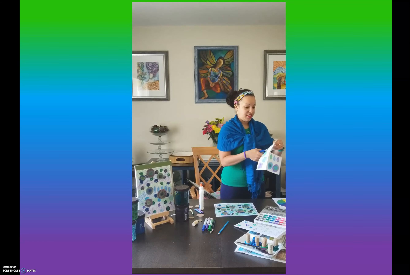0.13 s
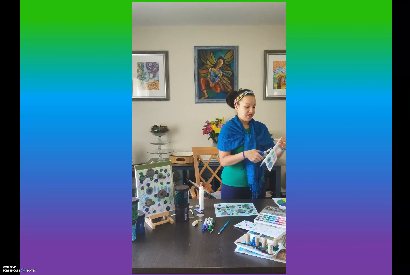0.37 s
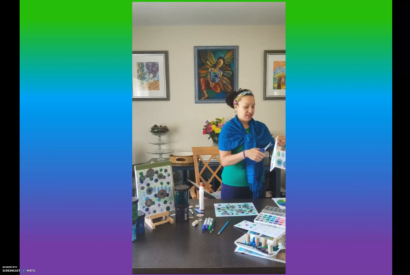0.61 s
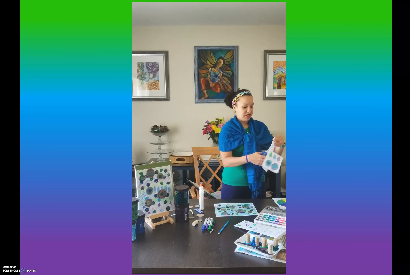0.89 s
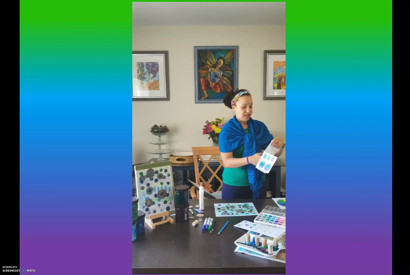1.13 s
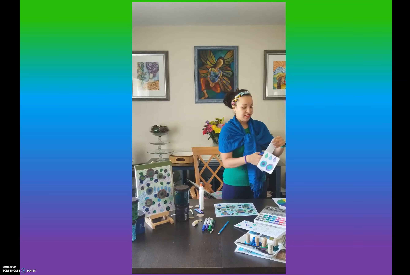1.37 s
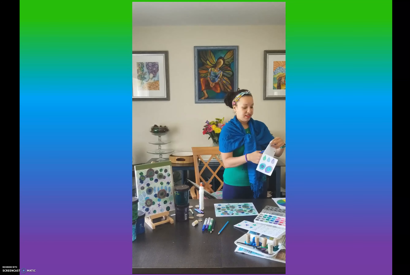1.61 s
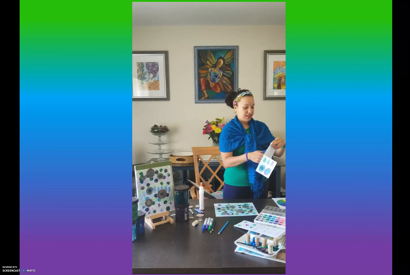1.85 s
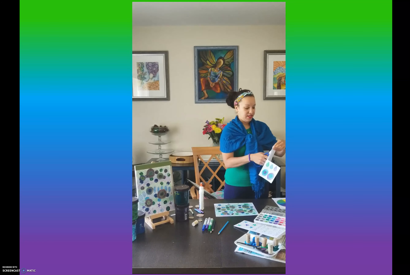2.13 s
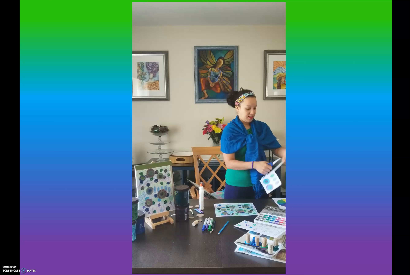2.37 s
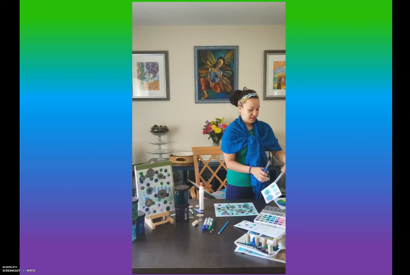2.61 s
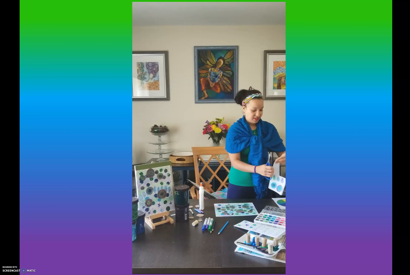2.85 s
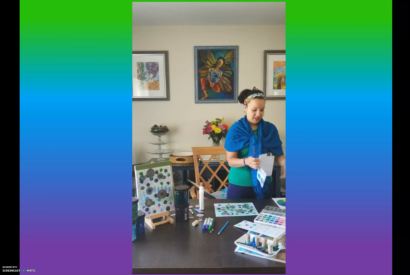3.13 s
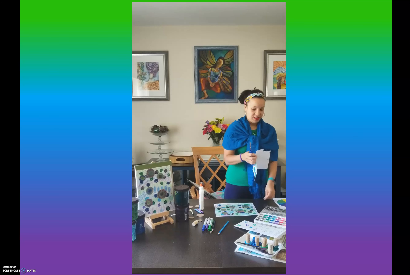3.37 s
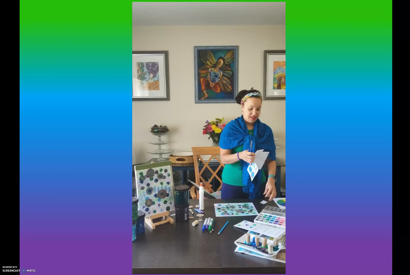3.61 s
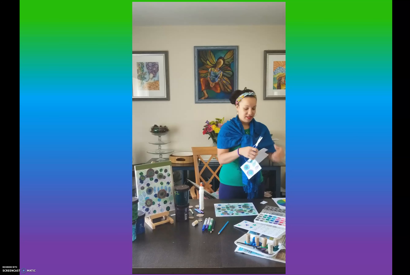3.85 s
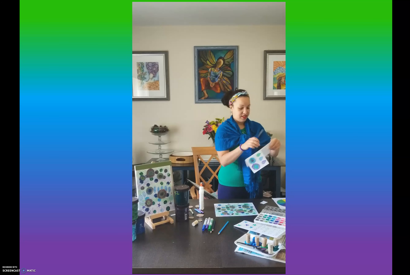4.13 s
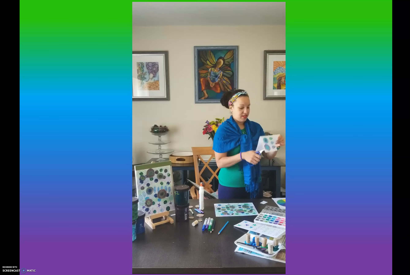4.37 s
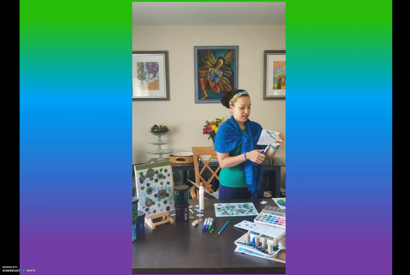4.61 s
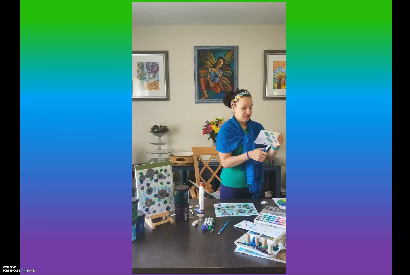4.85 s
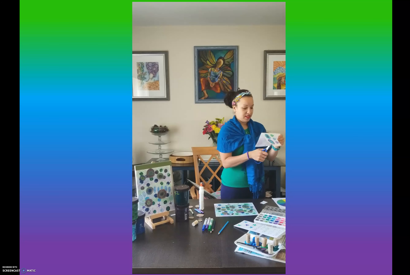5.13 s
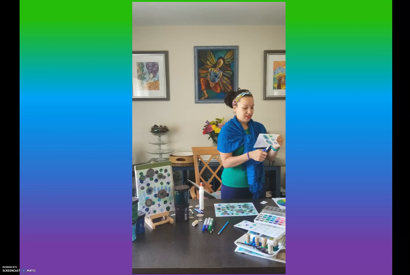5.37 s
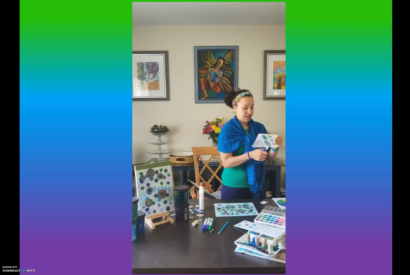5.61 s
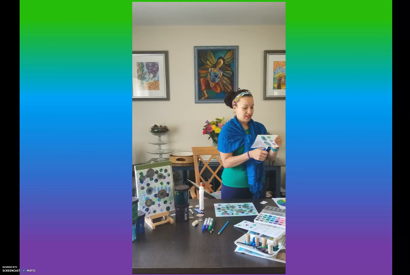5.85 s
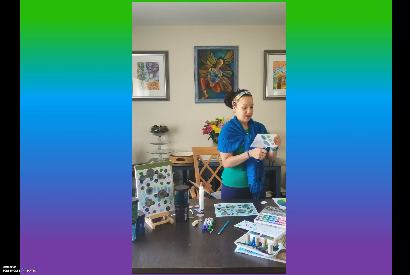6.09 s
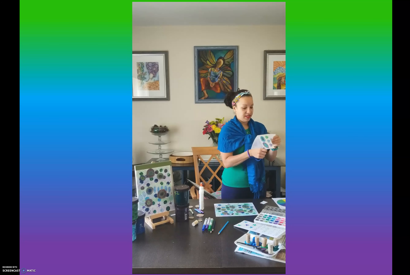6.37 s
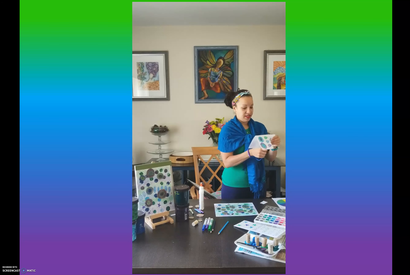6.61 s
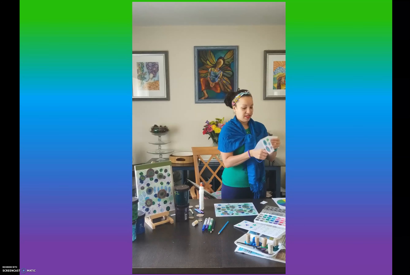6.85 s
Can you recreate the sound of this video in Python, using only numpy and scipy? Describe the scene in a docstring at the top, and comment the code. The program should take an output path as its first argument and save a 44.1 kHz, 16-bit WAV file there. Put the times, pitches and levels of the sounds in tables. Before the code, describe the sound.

Scissors crunch and shear through a creased sheet, with crisp crackles, flaps and soft hollow taps over faint indoor hush.

```python
"""A creased sheet crackles and scissors start biting through it, at a table in a small room.
One microphone stands a few steps away. Shear, rubbing and flapping are filtered grainy noise under gesture
curves; cracks, bites and knocks are short noise bursts; snaps are dying tone pairs; a blade squeaks once.
A sparse-tap room tail follows the paper, over a quiet room hush and a low swelling rumble of filtered noise.
"""
import sys
import numpy as np
from scipy import signal
from scipy.io import wavfile
from scipy.ndimage import uniform_filter1d

SR = 44100
rng = np.random.default_rng(int(sys.argv[2]) if len(sys.argv) > 2 else 0)


def unload_wav(signal):
    """Save mono or channel-first audio to the path in sys.argv[1] as 16-bit WAV at rate SR, clipped to [-1, 1]."""
    wavfile.write(
        sys.argv[1],
        SR,
        np.round(np.clip(np.atleast_2d(signal).T, -1, 1) * 32767).astype(np.int16),
    )


def decibels_to_gain(level_db):
    """Convert a level in decibels to a linear amplitude gain (20 dB per decade)."""
    exponent = np.asarray(level_db, float) / 20
    return 10 ** exponent


N = 307818  # length in samples

# Tables of a spectrum give, in each row, frequency in Hz and relative level in dB per Hz.
# The coming and going of the rumble, and less so of the hush. Each row: time in seconds, rumble level in dB.
SWELL = [(0.0, -67), (1.11, -60.5), (1.81, -82), (2.08, -67), (2.27, -77), (3.22, -64), (3.58, -74),
         (3.75, -64.5), (4.16, -76), (4.35, -64.5), (4.68, -74), (4.88, -68.5), (6.2, -65.5), (6.315, -83),
         (6.4, -67.5), (6.98, -65)]


def sheet():
    """The same parting fibres are heard in shear and rub; slower slaps shake the sheet."""
    fibres = grains(per_s=4000, spread_db=1.45, length_s=0.001)
    slaps = grains(per_s=400, spread_db=2.2, length_s=0.007)
    return shear(fibres) + rub(fibres) + flap(slaps)


def shear(fibres):
    """Each closing of the blades parts fibres, loudest around the pitch of the cut edge."""
    # Each row: moment of most force in seconds, force in dB, build-up in seconds, let-off in seconds,
    # pitch of the cut edge in Hz.
    strokes = [(.085, -43.5, 0.09, 0.03, 3550), (.18, -39.5, 0.046, 0.08, 3300),
               (.39, -35, 0.1, 0.037, 2500), (.465, -41, 0.03, 0.089, 3800),
               (.523, -36.5, 0.034, 0.083, 3800), (1.03, -37.5, 0.053, 0.31, 4350),
               (1.21, -46.5, 0.11, 0.071, 4370), (1.35, -41.5, 0.042, 0.047, 3120),
               (1.44, -43, 0.06, 0.11, 4220), (1.71, -46, 0.077, 0.21, 4870),
               (2.04, -47.5, 0.087, 0.12, 3820), (2.59, -49.5, 0.86, 0.066, 4480),
               (2.72, -53.5, 0.022, 0.035, 4560), (2.84, -47, 0.018, 0.033, 4240),
               (2.97, -43, 0.025, 0.12, 2540), (3.17, -47.5, 0.28, 0.12, 3480),
               (3.36, -45, 0.058, 0.12, 4000), (3.67, -51, 0.1, 0.41, 2800), (3.91, -45, 0.3, 0.037, 2510),
               (4.04, -49, 0.088, 0.054, 2500), (4.25, -45, 0.037, 0.058, 6500),
               (4.31, -42.5, 0.028, 0.1, 2500), (4.47, -54, 0.2, 0.21, 2880), (4.76, -57, .05, 0.066, 3480),
               (4.9, -50, 0.056, 0.1, 3780), (5.15, -43, 0.057, 0.12, 3140), (5.54, -40, 0.16, 0.37, 3160),
               (5.83, -45.5, 0.037, 0.11, 4200), (5.891, -40, 0.081, 0.077, 2700),
               (6.05, -41, 0.11, 0.082, 2350), (6.16, -43.5, 0.093, 0.12, 3930),
               (6.396, -34, 0.047, 0.063, 5800), (6.49, -42.5, 0.15, .13, 4170),
               (6.65, -41, 0.032, 0.17, 3130), (6.859, -34, 0.079, 0.058, 4970),
               (6.98, -39, 0.021, .1, 3760)]
    # Spectrum of paper being sheared.
    shear_spectrum = [(800, -45), (1100, -25), (1300, 0), (1700, -1), (4500, 5.5), (6800, 0), (7600, -1.5),
                      (10000, -22.5), (16000, -98.5)]
    s, force_db, rise, fall, hz = np.transpose(strokes)
    return edge(colour(fibres, shear_spectrum, ring=1.0), s, hz) * gestures(s, force_db, rise, fall)


def rub(fibres):
    """Fingers slide over the surface: bright fibre noise with random streaks of louder and softer pitch."""
    # Each row: moment of the top in seconds, level in dB, build-up in seconds, let-off in seconds.
    slides = [(.03, -48, 0.037, 0.018), (.075, -47, 0.42, 0.011), (.17, -51, 0.029, 0.076),
              (.54, -54, 0.5, 0.44), (.87, -54, 0.02, 0.19), (1.01, -44.5, 0.047, 0.33),
              (1.1, -52, 0.087, 0.11), (1.16, -42, 0.02, 0.057), (1.36, -44, 0.035, 0.11),
              (1.59, -51, 0.0059, 0.07), (1.69, -48.5, 0.017, 0.088), (1.9, -52, 0.0073, 0.11),
              (1.98, -47, 0.0099, 0.082), (2.16, -51, 0.033, .045), (2.57, -46, 0.24, 0.057),
              (2.72, -50, 0.025, 0.044), (2.86, -47.5, 0.044, 0.013), (3.19, -47.5, 0.15, 0.05),
              (3.38, -43.5, 0.099, 0.051), (3.67, -47.5, 0.055, 0.43), (3.93, -48, 0.23, 0.081),
              (4.33, -41.5, 0.062, 0.046), (4.55, -55, 0.15, 0.14), (4.68, -52.5, 0.012, 0.03),
              (4.76, -58, 0.054, .14), (4.9, -50.5, 0.1, 0.13), (5.15, -43, 0.047, 0.11),
              (5.45, -51.5, 0.072, 0.71), (6.12, -48, 0.062, 0.086), (6.44, -48, 0.11, 0.16),
              (6.88, -45, 0.2, 0.057), (6.98, -46, 0.04, .05)]
    # Spectrum of fingers on paper.
    rub_spectrum = [(3000, -17), (6000, 13), (8000, 9), (12000, 9.5), (15500, 8), (17000, -37)]
    streaks = patchy(signal.stft(colour(fibres, rub_spectrum, ring=0.78), nperseg=512)[2])
    rubbing = evened(signal.istft(streaks, nperseg=512)[1][:N])
    return rubbing * gestures(*np.transpose(slides))


def flap(slaps):
    """The sheet flaps in the hand, and the whole sheet booms below with the same slaps."""
    # Each row: moment of the top in seconds, level in dB, build-up in seconds, let-off in seconds,
    # boom of the whole sheet in dB re that level.
    flaps = [(0, -53, .1, 0.12, -5.5), (.19, -55, 0.025, 0.23, -5.5), (.41, -48.5, 0.098, 0.058, -6.5),
             (.52, -40.5, 0.022, 0.1, -8.5), (.89, -54.5, 0.21, 0.057, -1.5), (1.01, -47, 0.024, 0.29, -8),
             (1.18, -41.5, 0.12, 0.073, -9.5), (1.65, -62, 0.06, 0.41, -11), (2.06, -47, 0.064, .1, -10.5),
             (2.51, -58, 0.049, 0.22, -5), (2.57, -52.5, 0.12, 0.11, -4), (2.84, -65, 0.0092, 0.018, 6),
             (2.95, -36.5, .015, 0.093, -8), (3.11, -45.5, 0.096, 0.032, 2.5),
             (3.24, -53.5, 0.17, 0.055, -0.5), (3.4, -47, 0.043, 0.041, -9), (3.67, -47, 0.079, .15, -8.5),
             (3.95, -52.5, 0.43, 0.026, -9), (4.1, -57.5, 0.17, 0.16, -5.5),
             (4.315, -41, 0.06, 0.054, -2.5), (4.345, -40, 0.041, 0.022, -12),
             (4.39, -47.5, .04, 0.11, -12), (4.53, -52.5, 0.083, 0.046, -11),
             (4.67, -55.5, .025, 0.055, -4), (4.78, -53, 0.039, 0.56, -8), (5.13, -46.5, 0.078, 0.082, -13),
             (5.27, -49.5, 0.061, 0.026, -8), (5.44, -47.5, 0.029, 0.22, -4.5),
             (5.55, -43, 0.08, 0.085, -8), (5.87, -52, 0.11, 0.12, -6), (6.12, -47.5, 0.1, 0.093, -6.5),
             (6.4, -48.5, 0.051, 0.22, -3.5), (6.649, -36.5, 0.0085, 0.08, -8),
             (6.88, -46, 0.096, 0.13, -9)]
    # Spectrum of the flapping.
    flap_spectrum = [(350, -24.5), (600, 5), (800, -0.5), (1150, -2), (1500, 0.5), (2500, -0.5),
                     (5000, -38)]
    # Spectrum of the boom.
    boom_spectrum = [(120, -32), (300, -9), (410, -0.5), (520, 2), (700, -2), (1200, -49.5)]
    s, level_db, rise, fall, boom_db = np.transpose(flaps)
    flapping = colour(slaps, flap_spectrum, ring=1.0) * gestures(s, level_db, rise, fall)
    boom = colour(slaps, boom_spectrum, ring=0.69) * gestures(s, level_db + boom_db, rise, fall)
    return flapping + boom


def cracks():
    """Bright compact bursts of a crease, each with its own pitch and a duller body; faint ones fall at random."""
    # Creases cracking. Each row: time in seconds, peak in dB before colouring and trim,
    # body of the crack in dB re peak (likewise before its trim), length in seconds.
    creases = [(0.015, -21.5, -4, 0.0027), (0.061, -29.5, -9, 0.0096), (0.156, -32.5, -19, 0.0066),
               (0.2084, -26.5, -8, 0.0073), (0.2965, -24.5, -2, 0.0028), (0.509, -32, 4, 0.035),
               (0.696, -34, -20, 0.009), (0.733, -34.5, -37.5, 0.013), (0.769, -34, -21, 0.015),
               (0.7975, -25.5, -0.5, 0.0084), (0.816, -25, -30, 0.0081), (0.858, -9.5, -12, 0.005),
               (0.8627, -14.5, -18, 0.0084), (0.878, -22, -4, 0.011), (0.896, -29, -12, 0.014),
               (0.951, -30, -18, 0.0066), (0.97, -24, -24, 0.0056), (0.9915, -19.5, -30, 0.0077),
               (1.013, -18, -12, 0.011), (1.035, -21, -12, 0.007), (1.085, -16.5, -24, 0.0059),
               (1.117, -26, -14, 0.005), (1.125, -27, -13, 0.0095), (1.157, -19.5, -10, 0.004),
               (1.161, -17, -8, 0.013), (1.192, -17.5, -2, 0.0078), (1.215, -25, -6, 0.012),
               (1.32, -30.5, -7, 0.013), (1.348, -21.5, -6, 0.0073), (1.426, -21, -39, 0.0071),
               (1.596, -31.5, 0, 0.012), (1.684, -31.5, -25, 0.02), (1.904, -38.5, 5, 0.014),
               (2.136, -33.5, 3, 0.024), (2.154, -28.5, -24, 0.016), (2.303, -33, 0, 0.011),
               (2.476, -32, -1, 0.0094), (2.546, -31, -8, 0.01), (2.574, -29.5, 3, 0.033),
               (2.642, -30, -1.5, 0.012), (2.712, -27, 0.5, 0.013), (3.117, -33, 9, 0.017),
               (3.348, -32.5, 3, 0.0092), (3.372, -28.5, -0.5, 0.023), (3.395, -27.5, 3, 0.027),
               (3.57, -34.5, 1, 0.02), (3.596, -36, -1, 0.023), (3.621, -27, -8, 0.016),
               (3.661, -27, -11, 0.018), (3.684, -30.5, -11, 0.029), (3.798, -33.5, 1.5, 0.023),
               (3.874, -31, 1, 0.026), (3.892, -24, 5, 0.0066), (3.9495, -25, -1, 0.006),
               (3.962, -30, -10, 0.0073), (4.122, -30, 1, 0.0077), (4.25, -38, -14, 0.012),
               (4.327, -26.5, 3, 0.017), (4.44, -35, 7, 0.011), (4.469, -31, -9, 0.019),
               (4.532, -25.5, 1, 0.0079), (4.667, -40, -10, 0.019), (4.681, -31, -7, 0.011),
               (4.732, -29.5, -6, 0.0078), (4.76, -26, -5, 0.019), (4.789, -33, 3, 0.012),
               (4.835, -32.5, 3, 0.013), (4.851, -30, 3.5, 0.013), (4.891, -26, -3, 0.016),
               (4.939, -32, 5, 0.014), (4.978, -36, -5, 0.007), (4.995, -33.5, -4.5, 0.0077),
               (5.049, -34, -7, 0.0087), (5.12, -37, 1, 0.012), (5.253, -32.5, -15, 0.028),
               (5.282, -29, -2, 0.029), (5.304, -22.5, -18, 0.004), (5.408, -29.5, -1, 0.012),
               (5.603, -32, -10, 0.007), (5.64, -34, -12, 0.012), (5.711, -37, -6, 0.008),
               (5.7835, -28, 3, 0.014), (5.828, -28.5, -7, 0.042), (5.953, -32, -12, 0.038),
               (6.012, -32, -15, 0.0075), (6.107, -18, -3.5, 0.017), (6.254, -40, -20, 0.008),
               (6.3075, -25.5, -10, 0.0076), (6.427, -28.5, -15, 0.019), (6.564, -33, -1, 0.013),
               (6.63, -26.5, -10.5, 0.012), (6.694, -32, 6.5, 0.034)]
    # Spectrum of the bright part.
    crack_spectrum = [(2000, -10), (4500, 9.5), (6000, 6), (8000, 6), (11000, 3), (15500, 6), (17000, -9)]
    # Spectrum of the body.
    thud_spectrum = [(300, -5.5), (1000, -18.5), (2000, 12), (4000, 4), (5500, -2.5), (9000, -60.5)]
    spike_db, spike_s = -8, 0.00012  # a brief spike over the noise at each opening
    bright, body = np.zeros((2, N))
    # 24 small cracks at random moments, spread by 4 dB either way
    ticks = [(when * N / SR, -51 + 4 * (2 * size - 1), -6, 0.006)
             for when, size in rng.random((24, 2))]
    for s, peak_db, body_db, length in creases + ticks:
        rise = 0.0007 + 0.1 * length  # longer cracks also start more slowly
        hz = rng.uniform(5000, 14000)
        at, sound = burst(s, length, rise, 1.7, hz, sharpness=4, ring_share=0.6)
        t = np.arange(len(sound)) / SR
        spike = decibels_to_gain(spike_db) * np.exp(-((t - rise) / spike_s) ** 2)
        add(bright, at, decibels_to_gain(peak_db) * sound * (1 + spike))
        add(body, at, decibels_to_gain(peak_db + body_db) * sound)
    bright = decibels_to_gain(-15.0) * colour(bright, crack_spectrum, ring=0.084)
    return bright + decibels_to_gain(-17.0) * colour(body, thud_spectrum, ring=0.86)


def snaps():
    """A stiff fibre or fold lets go: a close pair of dying tones with a little grit, starting at once."""
    # Each row: time in seconds, peak of the lower tone in dB, its pitch in Hz.
    clicks = [(0.4542, -34, 4550), (0.4559, -28, 2910), (0.4603, -29, 4670), (0.4664, -29, 3420),
              (0.497, -28, 4430), (0.52, -28, 3000), (0.816, -32, 5260), (0.859, -27, 5360),
              (1.192, -21.5, 7400), (1.427, -35, 3620), (3.9476, -36, 1930), (3.953, -40, 3000),
              (4.246, -32, 7170), (4.2525, -34, 6860), (4.291, -38, 1200), (4.312, -34, 4570),
              (4.348, -36, 2340), (5.431, -36, 4250), (6.3864, -23, 6500), (6.391, -24.5, 5700),
              (6.3941, -21.5, 5200), (6.631, -42, 2440)]
    cycles = 6  # of the lower tone, over which the ring falls to 1/e
    out, t = np.zeros(N), np.arange(1500) / SR
    for (s, peak_db, hz), (detune, phase) in zip(clicks, rng.random((len(clicks), 2))):
        upper_hz = hz * (1.08 + 0.1 * detune)
        pair = np.sin(2 * np.pi * hz * t) + 0.6 * np.sin(2 * np.pi * (upper_hz * t + phase))
        grit = 0.09 * np.diff(rng.standard_normal(len(t) + 1))
        add(out, round(s * SR), decibels_to_gain(peak_db) * (pair + grit) * np.exp(-t * hz / cycles))
    return out


def bites():
    """A crunch starts at once when the blades close on fresh paper, then fades."""
    # Each row: time in seconds, peak in dB before colouring and trim, pitch in Hz,
    # length in seconds (anything over 0.09 counts as 0.09).
    closings = [(0.157, -37.5, 4160, 0.099), (0.451, -26, 4710, 0.12), (1.007, -21, 4320, 0.044),
                (1.431, -42, 3560, 0.032), (2.638, -32.5, 1940, 0.0071), (2.927, -28.5, 4250, 0.11),
                (3.085, -28, 980, 0.055), (3.401, -30.5, 2230, 0.0039), (3.919, -27.5, 2200, 0.0059),
                (4.311, -27.5, 1400, 0.027), (4.33, -30, 2290, 0.014), (4.763, -34, 2280, 0.028),
                (5.142, -34.5, 2240, 0.077), (5.432, -32.5, 4300, 0.13), (6.397, -41, 4710, 0.1),
                (6.642, -33.5, 1030, 0.099)]
    # Spectrum of the crunch.
    crunch_spectrum = [(200, -12), (450, -10.5), (1200, 2), (4500, 1), (7000, -14), (11000, -35)]
    crunch = np.zeros(N)
    for s, peak_db, hz, length in closings:
        at, sound = burst(s, length, 0.001218, 1.0, hz, sharpness=3.7, ring_share=0.39)
        add(crunch, at, decibels_to_gain(peak_db) * sound)
    return decibels_to_gain(-13) * colour(crunch, crunch_spectrum, ring=0.7)


def knocks():
    """The curled sheet is tapped or pops: a short puff of noise rings its hollow."""
    # Each row: time in seconds, peak in dB, pitch of the hollow in Hz.
    taps_and_pops = [(2.5, -48.5, 850), (2.573, -45, 820), (2.713, -50.5, 660), (2.838, -50, 694),
                     (3.326, -52, 833), (3.4, -46, 840), (3.599, -43.5, 840), (3.623, -49, 880),
                     (3.66, -40, 920), (3.689, -48, 850), (3.89, -50, 845), (4.253, -50, 525),
                     (4.974, -49.5, 720), (5.47, -49, 476), (5.511, -43.5, 480), (5.62, -43.5, 484),
                     (6.561, -50.5, 840)]
    out = np.zeros(N)
    for s, peak_db, hz in taps_and_pops:
        at, puff = burst(s, 0.02, 0.002, 1.2, hz, sharpness=4, ring_share=0)
        hollow = signal.iirpeak(hz, 5.1, SR)
        rung = signal.lfilter(*hollow, signal.lfilter(*hollow, puff))
        add(out, at, decibels_to_gain(peak_db) * rung / np.abs(rung).max())
    return out


def squeak():
    """A blade drags: a rising stick-slip tone with two overtones, wavering in pitch and fluttering in level."""
    # Each row: time in seconds, pitch in Hz, level of the lowest tone in dB, both before waver and flutter.
    drag = [(3.997, 1430, -58), (4.006, 1600, -43), (4.016, 1900, -45), (4.032, 2260, -46),
            (4.042, 2420, -56)]
    s, hz, db = np.transpose(drag)
    t = np.arange(N) / SR
    waver, flutter = (evened(uniform_filter1d(v, size=80)) for v in rng.standard_normal((2, N)))
    phase = 2 * np.pi * np.cumsum(np.interp(t, s, hz) * (1 + 0.014 * waver)) / SR
    tones = np.sin(phase) + 0.55 * np.sin(2 * phase) + 0.2 * np.sin(3 * phase)
    level = decibels_to_gain(np.interp(t, s, db, -200, -200))  # practically silent outside the drag
    return level * (1 + 0.3 * flutter) * tones


def room(x):
    """Sparse taps of random sign, each band dying at its own speed."""
    # Each row: frequency in Hz, time to die by 60 dB in seconds.
    decay = [(300, 0.26), (1500, 0.13), (5000, 0.15), (12000, 0.085)]
    taps = np.zeros(SR // 2)
    at = np.arange(300, len(taps) - 20, 20)
    taps[at + rng.integers(0, 20, len(at))] = rng.choice([-1., 1.], len(at))
    hz, t, z = signal.stft(taps, SR, nperseg=256)
    dying = decibels_to_gain(-60 * t / read(decay, hz)[:, None])
    tail = signal.istft(z * dying, SR, nperseg=256)[1]
    return signal.oaconvolve(x, tail / np.linalg.norm(tail))[:N]


def hush():
    """Filtered noise of the quiet room, its level gently following a share of the rumble's swell."""
    # Spectrum of the hush.
    hush_spectrum = [(41, -56), (70, -18), (262, -1.5), (462, 5), (797, 4.5), (1070, -31), (1410, 16),
                     (1690, 11.5), (4380, 8), (6300, 0), (10200, -31), (14900, -24), (16000, -18)]
    s, db = np.transpose(SWELL)
    noise = colour(rng.standard_normal(N), hush_spectrum, ring=0.76)
    return played(noise, s, -57 + 0.14 * (db - db.mean()))


def rumble():
    """Low filtered noise that swells and sinks, at times within a tenth of a second."""
    # Spectrum of the rumble.
    rumble_spectrum = [(15, 0.5), (30, -10), (44, 3), (60, -6.5), (120, -9.5), (250, -12), (500, -50)]
    return played(colour(rng.standard_normal(N), rumble_spectrum), *np.transpose(SWELL))


def grains(per_s, spread_db, length_s):
    """Noise in tiny bursts of uneven size: fibres parting one bunch after another."""
    starts = rng.random(N) < per_s / SR
    size = decibels_to_gain(spread_db * np.minimum(rng.exponential(1, N), 5)) * starts
    u = np.arange(800) / (SR * length_s)
    envelope = signal.oaconvolve(size, (1 - np.exp(-6 * u)) * np.exp(-u))[:N]
    return evened(envelope * rng.standard_normal(N))


def edge(x, s, hz):
    """Lifts a band with a narrow core that moves with the free length of the cut edge."""
    f, t, z = signal.stft(x, SR, nperseg=512)
    octaves = np.log2((f[:, None] + 1) / np.interp(t, s, hz))  # distance from the edge's pitch
    band_db = 5 * np.exp(-octaves ** 2 / 2)
    core_db = 4 * np.exp(-(octaves / 0.12) ** 2 / 2)
    return evened(signal.istft(patchy(z) * decibels_to_gain(band_db + core_db), SR, nperseg=512)[1][:N])


def patchy(z):
    """Narrow random streaks of louder and softer noise, each lasting a few hundredths of a second."""
    patches = rng.standard_normal(z.shape[::-1]).T
    patches = uniform_filter1d(patches, size=2, axis=0)  # across frequency
    patches = uniform_filter1d(patches, size=12, axis=1)  # along time
    return z * decibels_to_gain(2.9 * evened(patches))  # rms swing in dB


def gestures(s, db, rise, fall):
    """Each gesture climbs in dB to its top and sinks again; overlapping ones add in power."""
    fall_db = 12  # gained over the build-up and lost over the let-off
    roundness = 1.08  # 1 = pointed top, 2 = a rounded swell
    steps = np.arange(0, N, 64)
    late = steps[:, None] / SR - s
    under_db = fall_db * np.maximum(-late / rise, late / fall) ** roundness
    gain = np.sqrt((decibels_to_gain(db - under_db) ** 2).sum(axis=1))
    return np.interp(np.arange(N), steps, gain)


def burst(s, length, rise, squareness, hz, sharpness, ring_share):
    """Dense noise that rises fast and dies over its length; part of it rings at the pitch of the buckled patch."""
    t = np.arange(8000) / SR
    shape = (1 - np.exp(-(t / rise) ** 2)) * np.exp(-(t / min(length, 0.09)) ** squareness)
    noise = rng.standard_normal(len(t))
    ring = evened(signal.lfilter(*signal.iirpeak(hz, sharpness, SR), noise))
    start = round(max(s - rise, 0) * SR)
    return start, shape * (noise + ring_share * ring)


def colour(x, points, ring=0.):
    """Causal filter from a spectrum plus a share of the resonances; white noise keeps its rms."""
    # Resonances and one shallow dip near 1 kHz, shared by most filtered layers. Each row: frequency in Hz,
    # width in Hz, dB over the plain spectrum at a full share.
    resonances = [(460, 61, 8), (817, 160, 3), (1014, 90, -3.5), (1195, 285, 6.5), (1400, 45, 6),
                  (2500, 1040, 2.5), (2890, 73, 3), (3407, 95, 4), (4350, 720, 2), (4710, 330, 1),
                  (6500, 530, 6), (10700, 40, 8)]
    hz = np.abs(np.fft.fftfreq(8192, 1 / SR))
    rings_db = sum(d / (1 + (2 * (hz - f) / w) ** 2) for f, w, d in resonances)
    log_gain = np.log(decibels_to_gain(read(points, hz) + ring * rings_db))
    # minimum phase: the filter answers at once
    taps = np.fft.ifft(np.exp(np.conj(signal.hilbert(log_gain)))).real[:4096]
    return signal.oaconvolve(x, taps / np.linalg.norm(taps))[:N]


def read(points, hz):
    """Reads a curve on a log-frequency axis."""
    f, value = np.transpose(points)
    return np.interp(np.log(hz + 1), np.log(f + 1), value)


def evened(x):
    """Scales to rms 1."""
    return x / np.sqrt(np.mean(x ** 2) + 1e-20)


def played(x, s, db):
    """Puts a level curve on a sound."""
    return x * decibels_to_gain(np.interp(np.arange(N) / SR, s, db))


def add(mix, at, sound):
    """Adds a sound at a sample position."""
    part = mix[at:at + len(sound)]
    part += sound[:len(part)]


def scene():
    """Paper and blades with their room tail over hush and rumble, the same in both channels."""
    paper = sheet() + cracks() + snaps() + bites() + knocks() + squeak()
    mono = paper + decibels_to_gain(-9.5) * room(paper) + hush() + rumble()
    return np.tile(mono, (2, 1))


def roll_off(x):
    """The treble ends steeply here."""
    return signal.sosfilt(signal.butter(12, 16810, fs=SR, output="sos"), x)


def record(dry):
    """Limits the band to 15.9 kHz with a steep linear-phase filter and finishes the mix."""
    low_pass = signal.firwin(511, 15900, window=("kaiser", 9), fs=SR)
    limited = signal.oaconvolve(dry, low_pass[None], "same")
    return roll_off(limited)


dry = scene()
out = record(dry)
unload_wav(out)
```